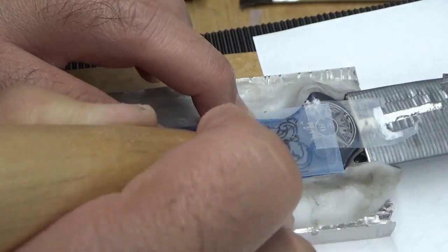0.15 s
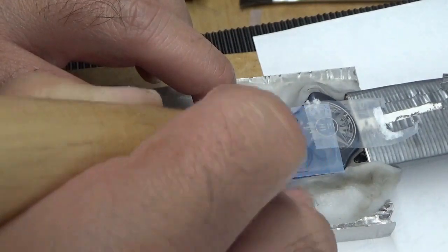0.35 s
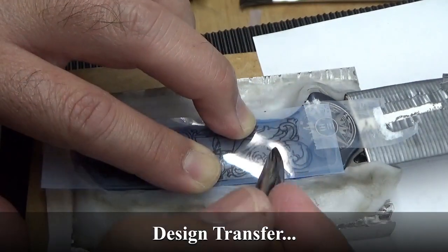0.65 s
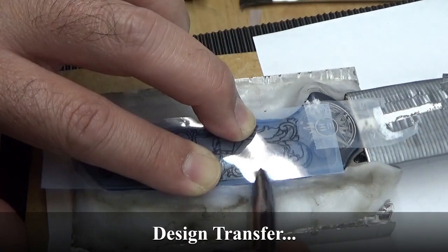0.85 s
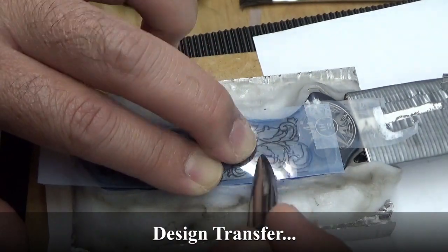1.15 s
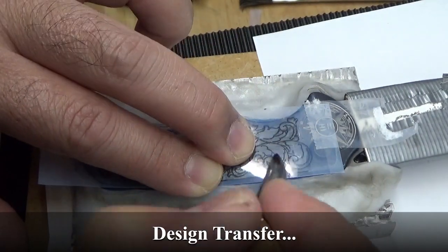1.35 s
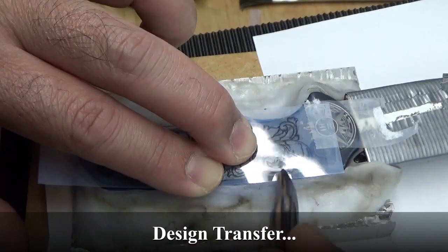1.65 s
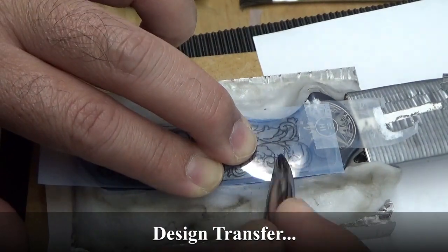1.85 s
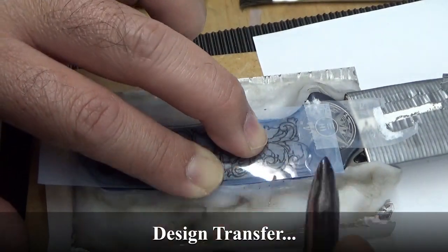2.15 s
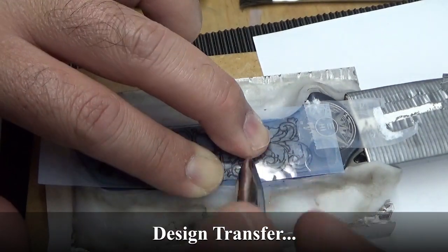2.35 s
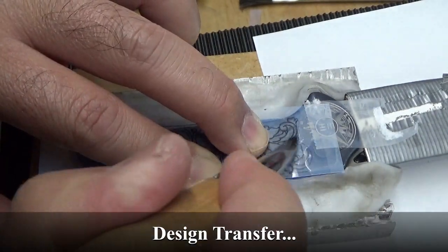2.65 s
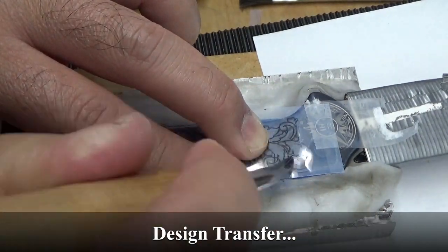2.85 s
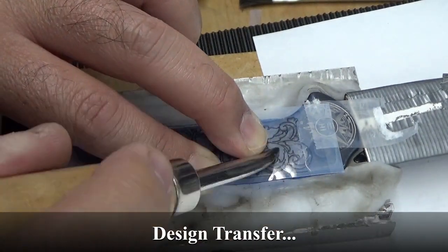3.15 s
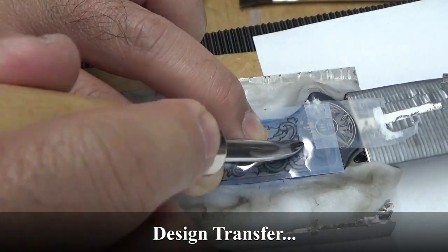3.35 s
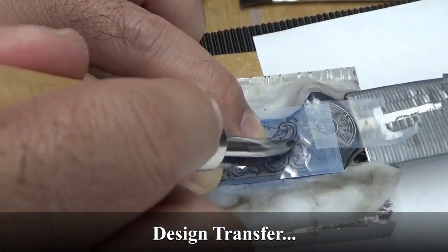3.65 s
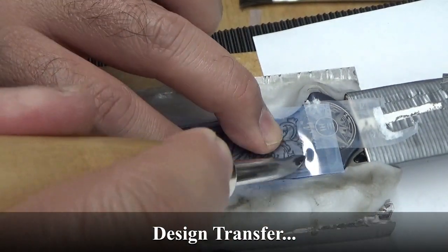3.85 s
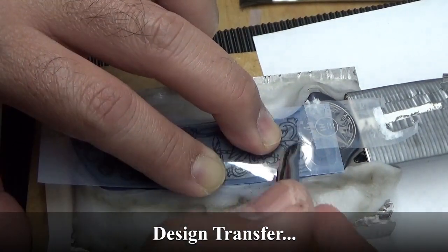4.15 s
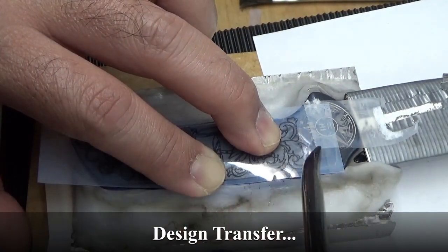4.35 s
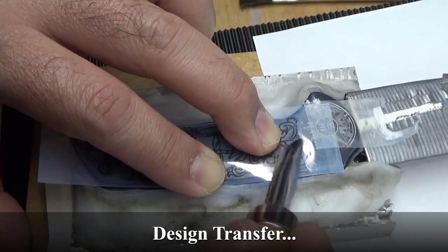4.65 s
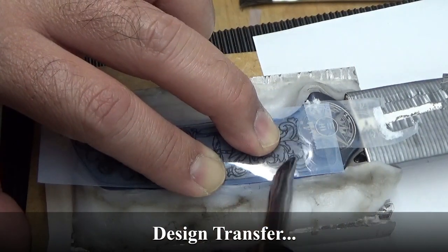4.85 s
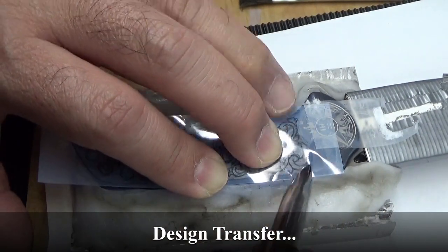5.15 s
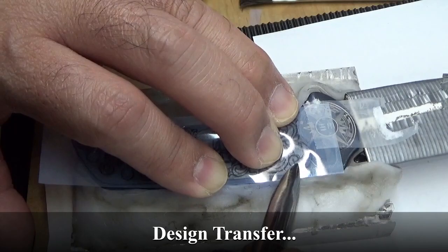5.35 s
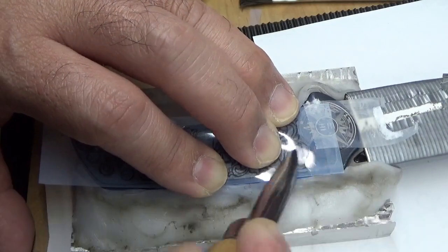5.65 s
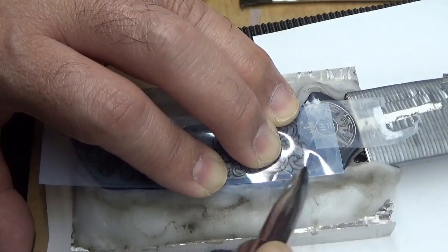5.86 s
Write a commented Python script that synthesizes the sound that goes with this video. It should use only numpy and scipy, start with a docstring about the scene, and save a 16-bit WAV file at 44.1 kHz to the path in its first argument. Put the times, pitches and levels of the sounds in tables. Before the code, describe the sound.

Steady low room hiss and a wavering hum lie under small, dry, close sounds. A few faint ticks come first, then one loud sharp knock, brief rubbing strokes and bright clicks, a small squeak before the middle, a sparser stretch, a second metallic knock late on, and scattered ticks and tiny scrapes to the end. Near microphones, slightly right of centre, no noticeable echo.

```python
"""Over the steady hiss and wavering hum of a small room, a steel graver works a metal handle covered in film.
From the start the point ticks as it touches down: sharp pulses through treble and body resonances.
Near 0.65 s it knocks hard and the steel modes ring briefly; then come short hissing strokes of filtered grains
and noise, light drags, and dull thuds of the clamp and bench modes. A small squeak, narrow-band noise, sounds
near 2.4 s, a faint knock near 4.1 s and a second hard knock near 4.54 s; ticks and strokes go on to the end."""
import sys
import numpy as np
from scipy import signal
from scipy.fft import rfft, irfft
from scipy.io import wavfile
from scipy.ndimage import uniform_filter1d

SR = 44100
rng = np.random.default_rng(int(sys.argv[2]) if len(sys.argv) > 2 else 0)


def file_out(sig):
    """Save sig as 16-bit WAV at sys.argv[1]."""
    # one column per channel
    cols = np.atleast_2d(sig).T
    # limit, then scale
    lim = np.clip(cols, -1, 1)
    pcm = np.round(lim * 32767).astype(np.int16)
    wavfile.write(sys.argv[1], SR, pcm)


N = 264600

# spectrum of the point scraping on the film: hz, gain_db
SCRAPE_SPECTRUM = [(200, -8), (900, -4), (1800, -2.5), (3000, -2.5), (4200, -1), (5500, -1), (6200, -0.5),
                   (7200, -1.5), (9000, 1.5), (10950, -2.5), (11250, -27), (16000, -50)]


def amp(db):
    """Level to amplitude: 20 dB is a factor of ten."""
    return 10 ** (np.asarray(db) / 20)


def unit(x):
    """Energy normalisation: the summed square, averaged over the channels, becomes 1."""
    energy = np.mean(np.sum(x ** 2, -1))
    return x / np.sqrt(energy + 1e-20)


def read(points, hz):
    """Spectral envelope: linear interpolation of the values on a log-frequency axis."""
    f, value = np.transpose(points)
    return np.interp(np.log(hz + 1), np.log(f + 1), value)


def add(mix, s, sound):
    """Superposition: adds a sound to both channels from time s, cut at the end of the mix."""
    part = mix[:, max(round(s * SR), 0):][:, :sound.shape[-1]]
    part += sound[..., :part.shape[1]]


def freqs(size):
    """Discrete Fourier analysis: the bin frequencies of a real spectrum, in Hz."""
    return np.fft.rfftfreq(size, 1 / SR)


def mid_side(mid, side, alike):
    """Interchannel coherence: shared and opposed parts give two channels with correlation alike."""
    alike = np.clip(alike, 0, 1)
    return np.sqrt((1 + alike) / 2) * mid + np.sqrt((1 - alike) / 2) * np.array([side, -side])


def pair(size, alike):
    """Partial coherence: white noise at two close microphones."""
    mid, side = rng.standard_normal((2, size))
    return mid_side(mid, side, alike)


def colour(x, gain):
    """Minimum-phase filtering: the log gain, relative to its peak, fixes the phase by a Hilbert transform."""
    log_gain = np.log(np.maximum(gain / gain.max(), 1e-5))
    both_sides = np.r_[log_gain, log_gain[-2:0:-1]]
    phase = -signal.hilbert(both_sides).imag[:len(gain)]
    return irfft(rfft(x) * np.exp(log_gain + 1j * phase))


def resonance(f, hz, width_hz):
    """Resonance: a single peak whose gain falls to half at width_hz from its centre."""
    return 1 / (1 + ((f - hz) / width_hz) ** 2)


def treble(f, top_hz, air_db):
    """Treble shelf: the gain drops above top_hz by air_db, then slopes down further."""
    return amp(np.interp(f, [top_hz, top_hz + 600, top_hz + 5000], [0, air_db, air_db - 13.5]))


def stop(t, length, fade=0.000595):
    """Short fade: a linear fade stops the sound at time length."""
    return np.clip((length - t) / fade, 0, 1)


def contact(scatter_db, t60, size=2048):
    """Impulse and early scattering: one sharp pulse, then decaying noise off hands and clamp."""
    t = np.arange(size) / SR
    after_pulse = t > 0.0003
    pulse = amp(scatter_db) * unit(pair(size, 0.65) * amp(-60 * t / t60) * after_pulse)
    pulse[:, 0] += 1
    return pulse


def snap(pulse, hz, width_hz, top_hz, air_db):
    """Impulse response: a contact heard through the broad treble resonance of the point."""
    f = freqs(pulse.shape[-1])
    return unit(colour(pulse, treble(f, top_hz, air_db) * resonance(f, hz, width_hz)))


def wobble(size, count):
    """Low-pass random process: smooth fluctuation of spread about 1, changing over count steps."""
    smooth = uniform_filter1d(uniform_filter1d(rng.standard_normal(size), count), count)
    return np.sqrt(1.5 * count) * smooth


def room():
    """Ambient noise: steady coloured air hiss, and a sine hum with slow amplitude modulation."""
    # spectrum of the air noise: hz, gain_db
    air_spectrum = [(20, -10.5), (60, -6), (130, -1.5), (300, -4.5), (500, -10), (1000, -11.5),
                    (2000, -17.5), (2800, -15.5), (3400, -21), (7000, -24), (10900, -25.5), (11300, -50.5),
                    (16000, -54)]
    # coherence of the two channels: hz, likeness
    likeness = [(60, 0.96), (180, 0.98), (550, 0.49), (1650, 0.13), (4970, 0.45), (15000, 0.89)]
    air_db, hum_db, hum_hz, waver = -59, -72, 123.5, 0.38  # rms levels; waver is the modulation spread
    f, t = freqs(N), np.arange(N) / SR
    mid, side = rfft(rng.standard_normal((2, N)))
    air = irfft(mid_side(mid, side, read(likeness, f)) * amp(read(air_spectrum, f)), N)
    drift = irfft(rfft(rng.standard_normal(N)) * (f < 5), N)
    hum = (1 + waver * drift / drift.std()) * np.sin(2 * np.pi * hum_hz * t)
    return np.sqrt(N) * (amp(air_db) * unit(air) + amp(hum_db) * unit(hum))


def thuds(rise_s=0.0024, rub_t60=0.2, size=4096):
    """Modal excitation: soft pushes swing the clamp on the bench while skin rubs on it."""
    # pushes of the hands: start_s, energy_db, pitch_factor, rub_re_thud_db, length_s
    pushes = [(0.6512, 7.5, 1.05, -19, 0.0066), (1.195, -18.5, 1.07, -4.5, 0.029),
              (1.2197, -16, 0.77, -9.5, 0.0052), (1.52, -28, 1.01, -2.5, 0.045),
              (2.229, -23, 0.39, -14, 0.037), (2.259, -20, .97, -1, .034), (2.425, -20, 1, -11, .044),
              (3.263, -27, 0.91, 1, 0.047), (3.595, -23, 0.75, -14, .04), (3.618, -24.5, 0.94, -6, 0.026),
              (3.6485, -12.5, 0.88, -8.5, 0.031), (4.06, -19, 0.85, -1, .009),
              (4.068, -16, 0.812, -5, 0.028), (4.41, -24, 0.9, -13, 0.019), (4.4452, -25, 0.88, -8, 0.017),
              (4.5406, -5, 1, -13.5, 0.021), (4.754, -27, 0.91, -7.5, 0.0073),
              (5.179, -24, .91, -22, 0.012), (5.655, -26, 0.89, -7, .03)]
    # modes of clamp and bench: hz, level_db, t60_s
    bench_modes = [(137.3, -18.5, 0.087), (274, 5.5, 0.025), (325.8, 3.5, 0.069), (424, -20, 0.071),
                   (632, -19, 0.086)]
    # spectrum of the rubbing: hz, gain_db
    rub_spectrum = [(30, -15.5), (130, 5), (320, -2), (480, .5), (720, 0.5), (1100, -18), (2500, -19.5),
                    (6000, -37), (12000, -63.5)]
    right_lag_s = 0.00018  # the swing reaches the right microphone this much later
    out, t = np.zeros((2, N)), np.arange(size) / SR
    hz, mode_db, t60 = np.transpose(bench_modes)[:, :, None]
    for s, db, pitch, rub_db, length in pushes:
        gate = (1 - np.exp(-t / rise_s)) * stop(t, length)
        modes = amp(mode_db - 60 * t / t60) * np.sin(2 * np.pi * hz * pitch * t)
        swing = -gate * modes.sum(0)
        heard = np.array([swing, np.interp(t - right_lag_s, t, swing)])
        rub = colour(pair(size, 0.63), amp(read(rub_spectrum, freqs(size)))) * amp(-60 * t / rub_t60)
        add(out, s, amp(db) * (unit(heard) + amp(rub_db) * unit(rub * gate)))
    return out


def squeak(size=8192):
    """Friction-driven resonance: the point catches with a little crunch and one mode sings as it dies away."""
    start_s, level_db, hz, width_hz, tone_t60 = 2.4257, -21, 1860, 70, 0.085
    grit_db, grit_t60, rise_s = -4, 0.02, 0.0006  # grit level is relative to the tone
    out, t, f = np.zeros((2, N)), np.arange(size) / SR, freqs(size)
    tone = colour(pair(size, 0.95), resonance(f, hz, width_hz)) * amp(-60 * t / tone_t60)
    grit = colour(pair(size, 0.7), amp(read(SCRAPE_SPECTRUM, f))) * amp(-60 * t / grit_t60)
    catch = np.minimum(t / rise_s, 1)
    add(out, start_s, amp(level_db) * catch * (unit(tone) + amp(grit_db) * unit(grit)))
    return out


def scrape(length, hz, flicker_db=2.3, sing_hz=1100, size=16384):
    """Sliding friction: slips over tiny bumps, with flickering pressure and a wandering singing peak.

    Gives the lead-in in s and a sound of rms 1 over its length."""
    grains_per_s, grit_db, patchy_db = 3500, 4.5, 2.5
    wander = 0.068  # spread of the singing pitch as a fraction
    t = np.arange(size) / SR
    bump_size = amp(grit_db * np.minimum(rng.exponential(1, size), 4))
    slips = (rng.random(size) < grains_per_s / SR) * bump_size
    drive = unit(slips * rng.choice([-1, 1], size)) + unit(pair(size, 0.91))
    f, _, z = signal.stft(drive, SR, nperseg=256)
    f, frames = f[:, None], z.shape[-1]
    peak_db = 5.5 + 3 * np.log2(hz / 5000)  # the higher it sings, the purer
    peak_hz = hz * (1 + wander * wobble(frames, count=6))
    sing = peak_db * np.exp(-0.5 * ((f - peak_hz) / sing_hz) ** 2)
    # random patches of louder and softer hiss over frequency and time
    patches = uniform_filter1d(rng.standard_normal(z.shape[1:]), size=6, axis=0)
    patches = uniform_filter1d(patches, size=8, axis=1)
    patch_gain_db = patchy_db * patches / patches.std()
    pressure_db = flicker_db * wobble(frames, count=4)
    z = z * amp(read(SCRAPE_SPECTRUM, f) + sing + patch_gain_db + pressure_db)
    hiss = signal.istft(z, SR, nperseg=256)[1][:, :size]
    length = max(length, 0.005)
    edge = 0.0037 + 0.28 * length  # longer strokes swell and fade more slowly
    press = np.sqrt(np.clip(t / edge, 0, 1) * stop(t, length + edge, edge))
    return edge / 2, np.sqrt(length * SR) * unit(hiss * press)


def strokes():
    """Frictional noise: short firm strokes, and light uneven drags of the point left on the film."""
    # firm strokes: start_s, length_s, level_db, singing_hz
    firm_strokes = [(0.649, .048, -52, 8000), (0.698, 0.071, -52, 5000), (0.811, .063, -53.5, 8700),
                    (0.891, 0.032, -52, 2000), (1.091, .033, -54.5, 1990), (1.18, 0.039, -55, 10000),
                    (1.222, .036, -56.5, 4950), (1.392, 0.061, -58, 4500), (1.484, 0.062, -60.5, 6900),
                    (1.594, .035, -57, 5650), (1.652, 0.13, -60.5, 2000), (2.024, 0.032, -55.5, 5940),
                    (2.26, 0.03, -50, 1990), (2.376, 0.1, -58.5, 2000), (2.455, .045, -50.5, 8440),
                    (2.61, 0.072, -59.5, 5430), (3.193, 0.035, -59.5, 5020), (4.119, 0.075, -54.5, 6500),
                    (4.324, .047, -57.5, 9900), (4.453, 0.064, -54.5, 7150), (4.961, 0.023, -52, 3000),
                    (5.194, 0.025, -59, 8600), (5.266, 0.023, -56.5, 8900), (5.368, 0.028, -57.5, 10200),
                    (5.642, 0.019, -55, 10000), (5.724, 0.033, -58, 7530), (5.918, 0.071, -57.5, 2040)]
    # light drags: start_s, end_s
    light_drags = [(0.795, 1.01), (1.35, 1.42), (1.501, 1.56), (1.799, 1.885), (2.085, 2.22), (2.48, 2.54),
                   (2.931, 2.99), (4.095, 4.25), (4.7, 4.77), (4.98, 5.13)]
    drag_db, drag_hz = -65, 7150
    out = np.zeros((2, N))
    for start, length, db, hz in firm_strokes:
        lead_in, hiss = scrape(length, hz)
        add(out, start - lead_in, amp(db) * hiss)
    for start, end in light_drags:
        lead_in, hiss = scrape(end - start, drag_hz, flicker_db=2.5, sing_hz=700)
        add(out, start - lead_in, amp(drag_db) * hiss)
    return out


def ticks():
    """Impact excitation: a bright snap and a duller body; brighter ticks have a higher, stronger body."""
    # touches of the point: start_s, snap_energy_db, snap_hz, brightness (0-1)
    touches = [(0.0224, -20.5, 9500, .9), (0.2014, -29, 8650, .3), (0.5894, -28.5, 8300, 0.4),
               (0.629, -17, 8900, 0), (0.8095, -32, 8700, 0.2), (1.177, -10.5, 9440, 0.1),
               (1.527, -26.5, 7900, 0.4), (1.976, -6, 8050, 0.2), (2.041, -26, 6960, .1),
               (2.227, -13, 9600, .02), (2.926, -15.5, 8550, 1), (3.0767, -20, 9100, 0),
               (3.1913, -33, 7000, .6), (3.6184, -17.5, 9500, 0.74), (3.8767, -29.5, 8500, 0.2),
               (3.8813, -30, 8230, .3), (3.9798, -31, 8050, .4), (4.2462, -30, 9700, 0),
               (4.251, -33, 9600, .2), (4.4159, -28, 9700, .4), (4.4923, -15, 8500, 0.7),
               (4.9317, -27, 9000, .3), (5.0775, -19.5, 8700, 0.2), (5.0898, -18.5, 8220, 0.3),
               (5.3066, -27.5, 8640, .4), (5.5543, -23, 8600, .05), (5.56, -30, 8600, 0.14),
               (5.6397, -23, 8600, 0.2), (5.703, -20.5, 8750, 0.1), (5.729, -13, 7400, 0.86)]
    # spectrum of the body: hz, gain_db
    body_spectrum = [(100, -18.5), (700, -10), (1300, 3), (2400, -7.5), (3700, 5.5), (4600, -2.5),
                     (5400, 8), (8000, 1.5), (11000, -9), (11600, -27), (16000, -42.5)]
    # each pair runs from the dullest to the brightest tick; air is the treble above 11 kHz
    dull_air_db, bright_air_db = -30.5, -7
    dull_body_db, bright_body_db = -18.5, -15.5
    dull_body_hz, bright_body_hz = 3700, 4884
    out, f = np.zeros((2, N)), freqs(2048)
    for s, db, hz, brightness in touches:
        air_db = dull_air_db + brightness * (bright_air_db - dull_air_db)
        body_hz = dull_body_hz + brightness * (bright_body_hz - dull_body_hz)
        body_db = dull_body_db + brightness * (bright_body_db - dull_body_db)
        body_db += 0.39 * max(-20 - db, 0)  # touches lighter than -20 dB have relatively more body
        body_db += -15.5 * np.log2(hz / 8500)  # dB per octave: a higher snap has less body
        pulse = contact(scatter_db=-2.5, t60=0.0072)
        body_gain = amp(read(body_spectrum, f)) * (0.15 + resonance(f, body_hz, width_hz=650))
        body = unit(colour(pulse, body_gain))
        bright_snap = snap(pulse, hz, width_hz=2450, top_hz=11020, air_db=air_db)
        add(out, s, amp(db) * (bright_snap + amp(body_db) * body))
    return out


def knocks(size=4096):
    """Modal selection: a crack, a crunch and steel modes; the place of the blow picks which ones speak."""
    # blows: start_s, crack_energy_db, crack_hz, crunch_energy_db, ring_energy_db, ring_centre_hz, length_s
    blows = [(0.6481, 5.5, 9700, -0.5, -9, 2700, 0.012), (0.6519, -13, 5920, -6, -6, 950, .0046),
             (4.1152, -21.5, 8650, -38, -23.5, 2830, .03), (4.539, -7.5, 4900, -7.5, 2.5, 6000, 0.031),
             (4.542, -12.5, 5280, -6.5, -11.5, 3510, 0.033)]
    # modes of graver and handle: hz, level_db, t60_s
    steel_modes = [(903, -10, 0.015), (1333, -6, 0.025), (1810, -5, 0.0286), (2754, -1, 0.029),
                   (3157, -7.5, 0.034), (3440, -8.5, .016), (3975, -6.5, 0.0112), (4476, -2.5, 0.0099),
                   (5360, -0.5, 0.013), (5530, 1, 0.018), (6720, 3.5, 0.012), (7630, -13.5, .011),
                   (7700, -5, 0.0096), (8700, 2.5, 0.013), (9180, 0.5, .011), (10150, -6, 0.00852)]
    # spectrum of the crunch: hz, gain_db
    crunch_spectrum = [(40, -4.5), (350, -17), (700, 2.5), (1300, 2), (3000, 4.5), (6000, -3), (9000, -2),
                       (11000, -6), (16000, -14.5)]
    out, t, f = np.zeros((2, N)), np.arange(size) / SR, freqs(size)
    hz, mode_db, t60 = np.transpose(steel_modes)[:, :, None]
    sign = (-1) ** np.arange(len(hz))[:, None]  # neighbouring modes swing against each other
    for s, crack_db, crack_hz, crunch_db, ring_db, centre_hz, length in blows:
        top_hz = min(crack_hz + 3700, 11000)  # above this the treble falls away
        spread = centre_hz / 2930  # octaves: a brighter blow wakes a wider spread of modes
        weight = amp(mode_db) / (1 + (np.log2(hz / centre_hz) / spread) ** 2)
        modes = (sign * weight * amp(-60 * t / t60) * np.sin(2 * np.pi * hz * t)).sum(0)
        ring = colour(modes * stop(t, length), treble(f, top_hz, air_db=-5))
        add(out, s, amp(ring_db) * unit(ring))
        grit = contact(scatter_db=9.5, t60=0.015, size=size)
        grit += amp(-8.5) * contact(scatter_db=7, t60=0.078, size=size)
        crunch_gain = amp(read(crunch_spectrum, f)) * treble(f, top_hz, air_db=-6)
        crunch = colour(grit * stop(t, length), crunch_gain)
        add(out, s, amp(crunch_db) * unit(crunch))
        pulse = contact(scatter_db=-0.5, t60=0.0098)
        crack = snap(pulse, crack_hz, width_hz=1800, top_hz=top_hz, air_db=-11.5)
        add(out, s, amp(crack_db) * crack)
    return out


def scene():
    """Level-difference stereo: the work lies just right of centre, the knocks slightly further right."""
    background = room()
    work = thuds() + squeak() + strokes() + ticks()
    work += knocks() * amp([[-0.6], [0.6]])
    return background + work * amp([[-0.2], [0.2]])


def record(dry):
    """Band limitation: the recorder's linear-phase low-pass filter at 16.2 kHz."""
    low_pass = signal.firwin(511, 16200, window=("kaiser", 9), fs=SR)
    return signal.oaconvolve(dry, low_pass[None], "same")


dry = scene()
out = record(dry)
file_out(out)
```